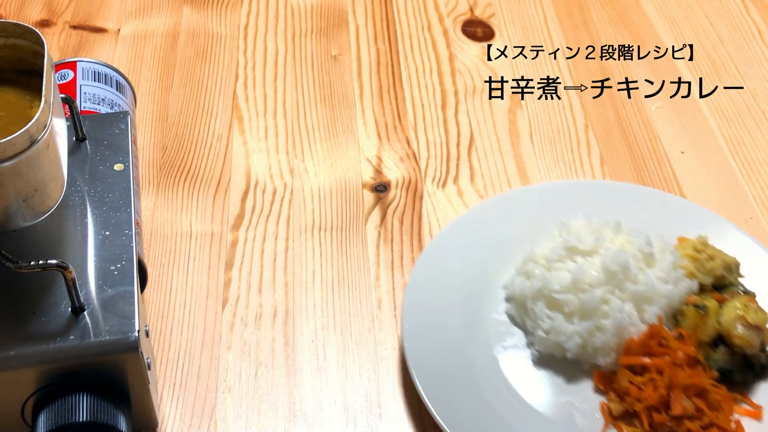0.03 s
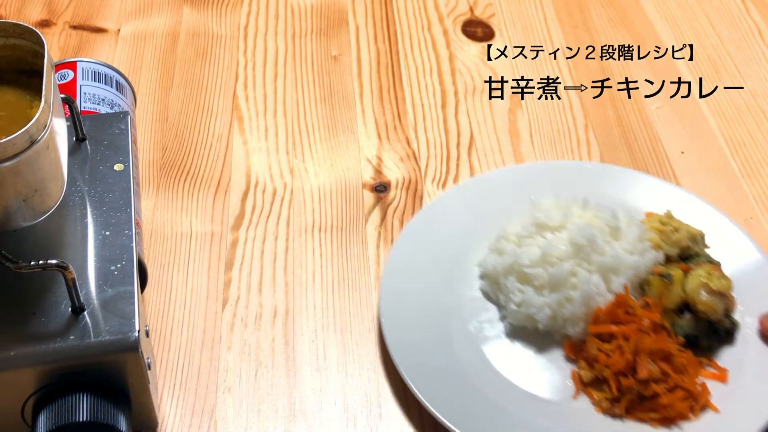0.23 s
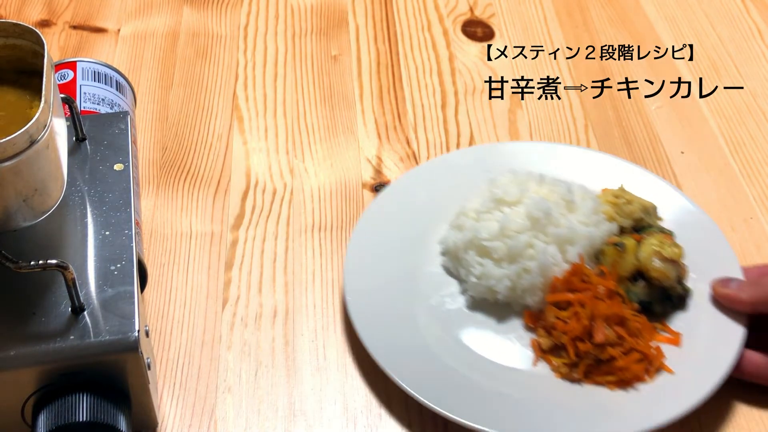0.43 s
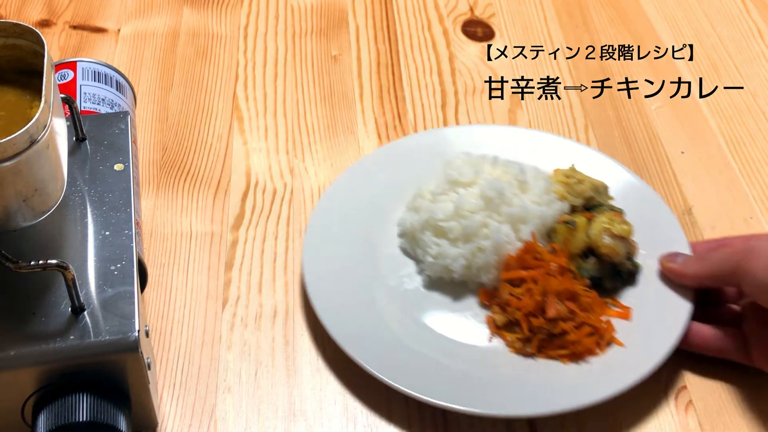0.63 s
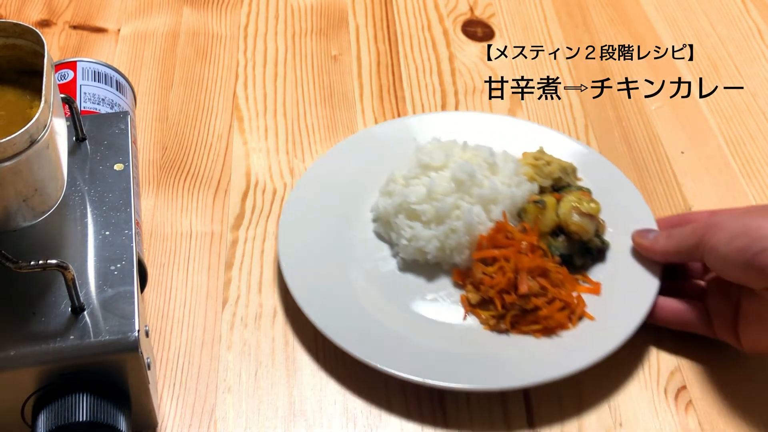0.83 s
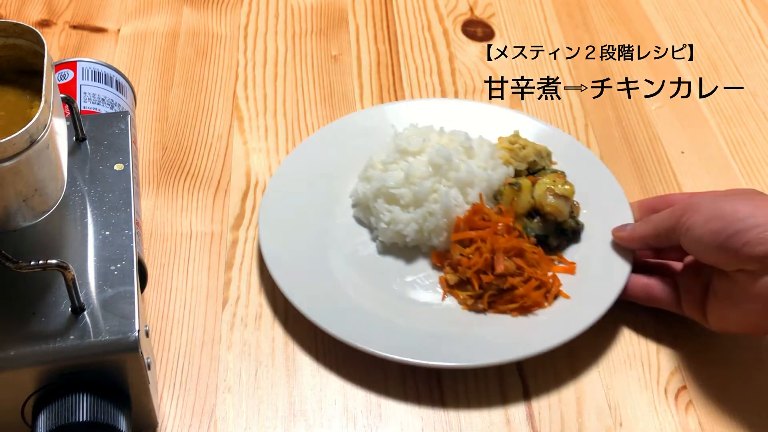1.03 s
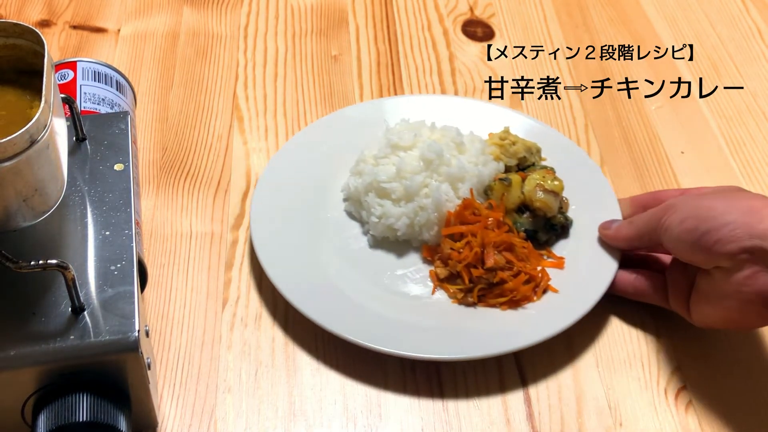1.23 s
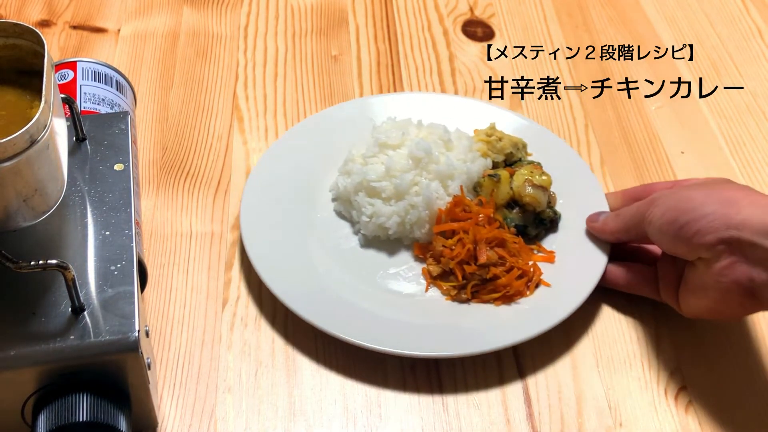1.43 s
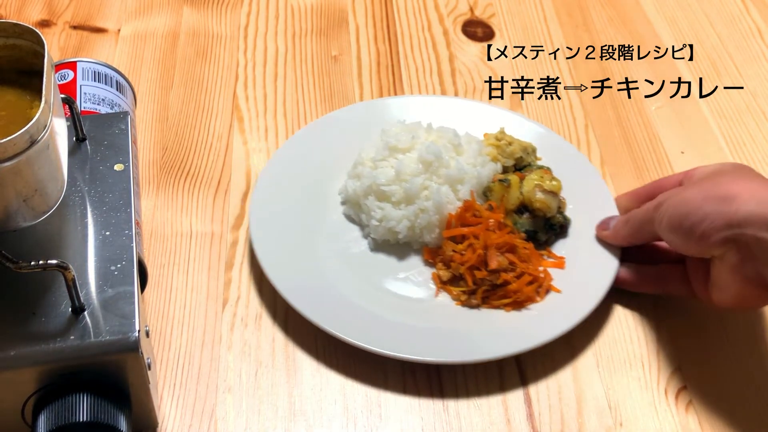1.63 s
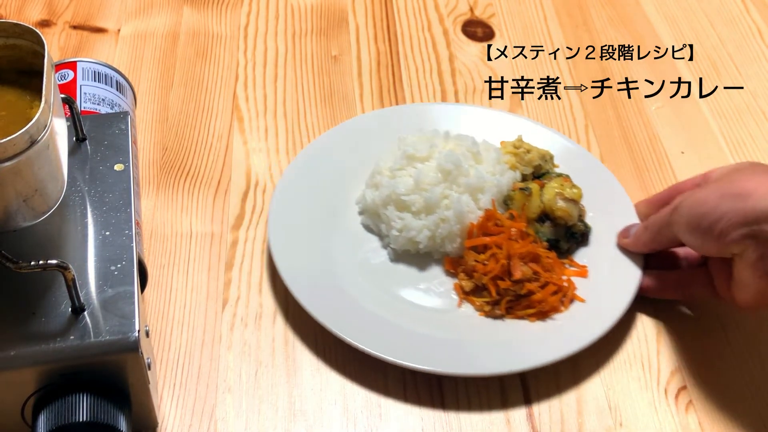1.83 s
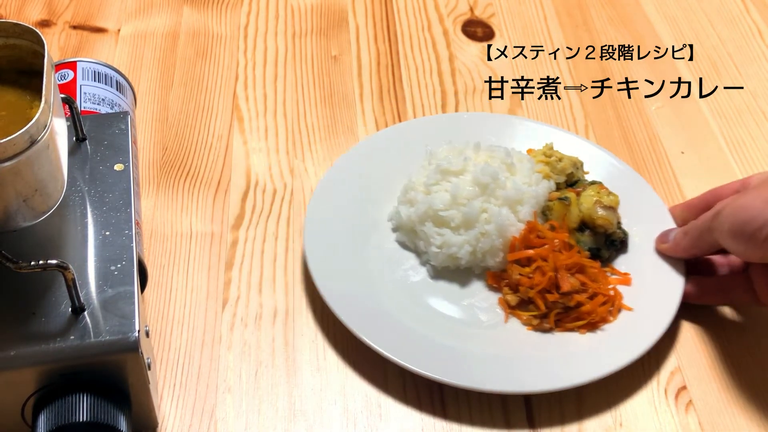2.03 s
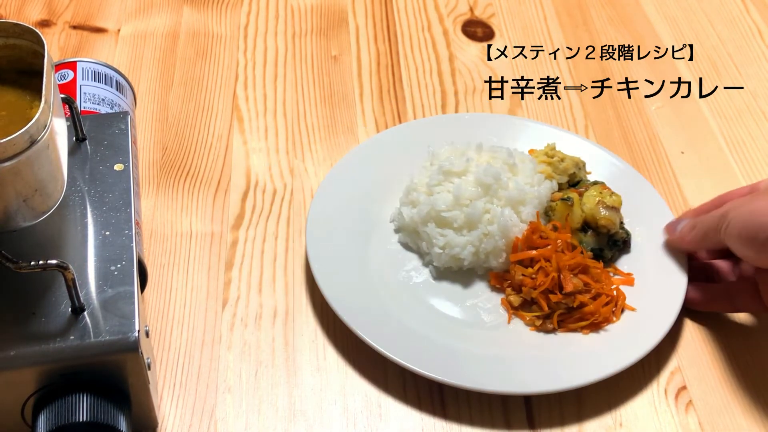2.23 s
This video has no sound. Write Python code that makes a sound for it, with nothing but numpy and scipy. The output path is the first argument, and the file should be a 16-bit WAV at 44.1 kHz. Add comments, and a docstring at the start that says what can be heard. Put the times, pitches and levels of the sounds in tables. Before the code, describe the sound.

A loaded china plate is set down on a wooden table with a dull knock, then pushed across it with a grinding scrape, nudged, and slid again. A few faint ticks sound nearby in a quiet small room.

```python
"""In a quiet small room, a loaded china plate is set down on a wooden table, pushed across it,
nudged, and after a pause slid again. The rim under the plate, its foot ring, knocks on the wood and
then grinds over the grain in thousands of tiny slips. Both shake the same modes (a mode is one note
an object rings at): the boards ring low, the china rings high, and rubbing briefly makes single notes sing.
A few tiny ticks, dry snaps and a light clink sound nearby, over a low murmur of air."""
import sys
import numpy as np
from scipy import signal
from scipy.io import wavfile

SR = 44100
rng = np.random.default_rng(int(sys.argv[2]) if len(sys.argv) > 2 else 0)


def transcribe(u):
    """Save the signal u as a 16-bit wav file named by the first command-line argument.

    u: samples, shape (n,) or (channels, n), limited to [-1, 1]; the rate is SR.
    q: integer samples, one column per channel.
    """
    v = np.clip(np.atleast_2d(u).T, -1, 1)
    q = np.round(v * 32767).astype(np.int16)
    wavfile.write(sys.argv[1], SR, q)


N = 101429
T = np.arange(N) / SR

# Levels in the tables are relative. A ring time, or t60, is how long a sound takes to fade by 60 dB.
# modes of the table top (pitch [Hz], level when rubbed [dB], level when knocked [dB], ring time [s])
WOOD_MODES = [(69, -9, -25, 0.82), (148, -11, -16, 0.071), (206.6, -4, -2, .28), (247.4, -1, -2, 0.54),
              (285.7, -5.5, -17.5, 0.1), (315.7, -9.5, -8.5, 0.061), (353, -6.5, 0, 0.11),
              (395.4, 0, 3.5, 0.22), (432, -9.5, -10.5, 0.076), (604.4, -9.5, -7, 0.094),
              (755, -33, -10, 0.28), (882.5, -9, -10.5, 0.052), (1225, -17, -15, 0.094),
              (1291, -23, -21.5, .1)]
# modes of the plate, damped by the food; the first row, near 1573 Hz, is a high mode of the table top # (pitch
# [Hz], level when rubbed [dB], level when knocked [dB], ring time [s])
CHINA_MODES = [(1573, -20, -15, 0.065), (2386, -28, -28, 0.013), (3041, -24.5, -18, 0.047),
               (3196, -33, -29, 0.047), (3413, -27, -22.5, 0.039), (3957, -34.5, -41, 0.078),
               (4578, -36, -59, 0.061), (4917, -32.5, -45, 0.055), (5085, -40.5, -50, 0.017),
               (6060, -44, -37, 0.026), (7170, -40.5, -41, 0.044), (8900, -57, -58, .03)]
# the foot ring lands, settles, and later jerks as it sticks and slips
# (time [s], force [dB], time for the force to peak [ms], added hard click [dB])
FOOT_KNOCKS = [(0.2466, 35.5, 0.16, -11), (0.2534, 36.5, 0.4, -27), (0.2927, 28, 0.33, -17),
               (0.385, 19, .5, -23), (1.905, 18, 0.6, -24), (1.935, 21.5, 0.4, -30),
               (1.966, 24.5, 0.65, -33)]
# tone of the dull landing thud (frequency [Hz], level [dB])
THUD_TONE = [(30, -40), (65, -11), (105, -11.5), (170, 5.5), (330, -1.5), (600, -1), (900, -11),
             (1200, -23), (2400, -34), (3100, -18.5), (4100, -51.5), (5800, -35), (9000, -55), (16000, -56)]
# how long each part of the thud lasts (frequency [Hz], ring time [s])
THUD_RING_TIMES = [(60, 0.85), (180, 0.21), (350, 0.17), (600, 0.055), (1500, 0.23), (3000, 0.026),
                   (8000, 0.016)]
# how loud the three slides are as they go (time [s], rumble [dB], grind [dB], scrape [dB], hiss [dB])
PUSH_LEVELS = [(0.335, -44.5, -38.5, -53.5, -63), (0.361, -36.5, -55, -56.5, -75),
               (0.397, -46, -46, -45, -62.5), (0.413, -43.5, -46.5, -52.5, -62),
               (0.493, -40.5, -38.5, -47, -62), (0.559, -39.5, -43.5, -50.5, -62),
               (0.611, -43, -34, -45, -59), (0.769, -51.5, -42.5, -51, -63.5),
               (0.819, -44.5, -42, -54, -68), (0.835, -48, -43, -52.5, -62), (0.879, -60, -41.5, -54, -64),
               (0.919, -49.5, -41.5, -59, -66), (1.059, -46.5, -43.5, -53, -62),
               (1.165, -53.5, -50.5, -59, -74), (1.23, -56.5, -55.5, -67, -87)]
NUDGE_LEVELS = [(1.29, -58.5, -56, -71, -92), (1.352, -47.5, -52, -65.5, -80),
                (1.402, -55, -49.5, -65, -74), (1.418, -51, -46, -56.5, -77), (1.46, -51, -50, -63.5, -76),
                (1.5, -59, -58.5, -72.5, -86)]
LAST_SLIDE_LEVELS = [(1.66, -54.5, -69.5, -70.5, -88), (1.71, -48.5, -42.5, -56, -64),
                     (1.768, -43.5, -48, -56.5, -65.5), (1.802, -45.5, -54.5, -61, -76),
                     (1.826, -46.5, -49, -69.5, -71), (1.856, -48, -43.5, -55.5, -63),
                     (1.876, -50, -43.5, -57, -67), (1.92, -37.5, -46, -54.5, -64),
                     (2.028, -46, -35.5, -44.5, -56), (2.068, -43.5, -42.5, -43.5, -56),
                     (2.12, -43.5, -35, -50, -61.5), (2.176, -48, -54, -61, -80),
                     (2.222, -70, -58.5, -72, -103), (2.25, -57.5, -83, -75, -81)]
# where the rumble, grind, scrape and hiss lie (low edge [Hz], high edge [Hz])
SLIDE_BANDS = [(30, 330), (330, 1100), (1100, 4000), (4000, 17000)]
# tone of the slides, set by which part of the foot ring presses on the wood (frequency [Hz], level [dB])
PUSH_TONE = [(60, -9), (200, 5), (320, 0), (395, 1), (600, 3), (690, 3), (880, -0.5), (1300, -1),
             (2200, -4), (3000, -4), (5000, -1), (7000, -3.5), (15000, -8.5)]
LAST_SLIDE_TONE = [(60, -10.5), (110, -4), (200, -2.5), (320, -2), (400, -2.5), (680, 7), (880, -1.5),
                   (1300, 4.5), (2200, 3.5), (3000, 0), (5000, -3), (7000, -2), (15000, -12)]
# the many weak modes between the strong ones (frequency [Hz], level [dB])
WEAK_MODE_TONE = [(40, -38), (110, -29), (200, -20), (330, -17.5), (500, -28.5), (1000, -23), (1400, -24),
                  (2000, -23.5), (2700, -37.5), (4000, -45), (6000, -49), (10000, -49), (16000, -51)]
# notes set singing by rubbing (middle time [s], length [s], pitch [Hz], pitch spread [Hz], level [dB])
SUNG_NOTES = [(.43, .2, 3030, 44, -56.5), (.49, .26, 4580, 47, -63.5), (0.358, 0.27, 4830, 82, -66.5),
              (0.674, 0.39, 4990, 81, -62.5), (.49, 0.087, 890, 27, -44.5), (0.589, 0.075, 810, 10, -39),
              (.81, .16, 389, 9.3, -42), (.94, .1, 390, 6.8, -43), (1.06, 0.22, 281, 3.3, -42.5),
              (1.023, 0.13, 77, 15, -55), (1.8, 0.16, 85, 26, -60), (2, 0.26, 3100, 73, -59),
              (2.05, 0.25, 4900, 170, -61.5), (2.07, .14, 1300, 140, -47.5), (1.9, 0.11, 370, 12, -43)]
# small metallic ticks (time [s], level [dB])
METAL_TICKS = [(.6205, -54), (1.462, -53)]
# modes of the ticking metal (pitch [Hz], level [dB], ring time [s])
METAL_MODES = [(5560, -13, .03), (6680, -6, 0.042), (7800, -8, 0.024), (9490, -0.5, 0.031),
               (11170, -20, .04), (12110, -19, 0.043), (13600, -9, .03), (15130, -14, .04),
               (15900, -9, .04)]
# dry snaps (time [s], level [dB], middle frequency [Hz])
DRY_SNAPS = [(0.297, -61, 11000), (.9505, -57.5, 8500), (.994, -61, 13000), (1.6321, -58, 12200)]
# modes of the light clink (pitch [Hz], level [dB], ring time [s])
CLINK_NOTES = [(3440, 0, 0.069), (3530, -16, 0.027), (6080, -19, 0.095), (7500, -10.5, .12),
               (9300, -23, 0.1), (11100, -17, .1), (13100, -28, .08)]
# tone of the air in the room (frequency [Hz], level [dB])
AIR_TONE = [(15, -46.5), (25, -27), (59, -10), (120, -20), (153, -2.5), (326, -23.5), (531, -20.5),
            (591, -22.5), (2280, -36.5), (16000, -47)]

SLIPS_PER_S, SLIP_SPREAD_DB = 6000, 3
CHATTER_DB, CHATTER_HZ = 0.8, 83  # a fast, random flutter in the strength of the slips
SLIDE_RISE_S, SLIDE_FALL_S = 0.1025, 0.095
ECHO_DB, ECHO_T60_S = -12, 0.55


def knocks(response, low_cut_hz=110):
    """The foot ring strikes the boards; the shorter the blow, the brighter it sounds."""
    force, t = np.zeros(N), T[:SR // 10]
    for s, db, peak_ms, click_db in FOOT_KNOCKS:
        progress = t * 1000 / peak_ms
        blow = progress * np.exp(-progress)
        click = amp(click_db) * (t == 0)
        add(force, s, amp(db) * (blow / blow.sum() + click))
    low_cut = signal.butter(2, low_cut_hz, "highpass", fs=SR, output="sos")
    return through(signal.sosfilt(low_cut, force), response)


def landing_thud(start_s=0.2455, energy_db=8.5, rise_cycles=0.42):
    """The plate lands with a dull thud, whose bass swells later than its treble."""
    out, thud, t = np.zeros(N), np.zeros(SR // 2), T[:SR // 2]
    noise = colour(rng.standard_normal(SR), THUD_TONE)
    for hz in 1.2 * 2. ** np.arange(5, 14):  # the low edge of each octave
        octave = band(noise, [hz, 2 * hz])[-len(t):]
        rise = 1 - np.exp(-(t * hz / rise_cycles) ** 2)
        thud += octave * rise * fade(read(THUD_RING_TIMES, hz * np.sqrt(2)))
    add(out, start_s, amp(energy_db) * thud / np.linalg.norm(thud))
    return out


def slide(response, levels, tone, gain_db):
    """Thousands of tiny uneven slips shake the table and the plate."""
    size_db = SLIP_SPREAD_DB * np.minimum(rng.exponential(1, N), 4)
    sizes = amp(size_db) * rng.choice([-1, 1], N)
    chatter = unit(band(rng.standard_normal(N), [CHATTER_HZ / 2, CHATTER_HZ * 2], order=2))
    slipping = rng.random(N) < SLIPS_PER_S / SR
    slips = sizes * slipping * amp(CHATTER_DB * chatter)
    grinding = colour(through(slips, response) + weak_modes(slips), tone)
    times, *curves = np.transpose(levels)
    start, end = times[0], times[-1]
    moving = np.interp(T, [start - SLIDE_RISE_S, start, end, end + SLIDE_FALL_S], [0, 1, 1, 0])
    bands = [unit(band(grinding, edges)) * amp(np.interp(T, times, curve))
             for edges, curve in zip(SLIDE_BANDS, curves)]
    return amp(gain_db) * moving * sum(bands)


def table_and_plate(knocked):
    """How the wood and the china ring together after one tiny blow."""
    response = np.zeros(SR // 2)
    for k, (hz, rub_db, knock_db, t60) in enumerate(WOOD_MODES + CHINA_MODES):
        balance = 2 * np.log(1000) / (t60 * SR)  # long and short modes boost their own pitch alike
        response += (-1) ** k * balance * ring(hz, knock_db if knocked else rub_db, t60)
    return response


def weak_modes(slips, spots=4, new_spot_s=0.1571, t60=0.061):
    """Each new spot of the table answers the slips with its own weak modes."""
    out, place = np.zeros(N), T / new_spot_s
    for k in range(spots):  # the spots take turns, each fading into the next
        distance = abs((place - k + spots / 2) % spots - spots / 2)
        share = np.cos(np.pi / 2 * np.minimum(distance, 1))
        out += through(slips * share, noise_tail(t60))
    return colour(out, WEAK_MODE_TONE)


def singing(steadiness=0.56):
    """Single modes swell and fade as the foot ring catches; rubbing evens out their strength."""
    out = np.zeros(N)
    for middle_s, length, hz, spread_hz, db in SUNG_NOTES:
        t = np.arange(round(length * SR)) / SR
        t60 = np.log(1000) / (np.pi * spread_hz)
        shaken = through(rng.standard_normal(SR), ring(hz, 0, t60))
        wavering = signal.hilbert(band(shaken, [hz / 1.5, hz * 1.5], order=2))[-len(t):]
        note = unit(wavering.real / abs(wavering) ** steadiness)  # abs() is its strength at each moment
        swell = np.sin(np.pi * t / length)
        add(out, middle_s - length / 2, amp(db) * note * swell)
    return out


def small_clicks(tick_crack_db=-5.5, clink_s=2.2875, clink_db=-50.5):
    """Metallic ticks, perhaps from a cooling stove, dry snaps and a light clink."""
    out = np.zeros(N)
    metal = sum(ring(*mode) for mode in METAL_MODES)
    for s, db in METAL_TICKS:
        add(out, s, amp(db) * (metal + amp(tick_crack_db) * crack(hz=11000)))
    for s, db, hz in DRY_SNAPS:
        add(out, s, amp(db) * crack(hz))
    add(out, clink_s, amp(clink_db) * sum(ring(*mode) for mode in CLINK_NOTES))
    return out


def crack(hz, octaves=0.8, t60=0.016):
    """A few milliseconds of bright noise."""
    edges = hz * 2 ** (octaves * np.array([-0.5, 0.5]))
    return unit(band(rng.standard_normal(SR // 2), edges, order=2)) * fade(t60)


def room_echo(sound):
    """The walls of the small room send back a soft, fading wash of sound."""
    return amp(ECHO_DB) * through(sound, noise_tail(ECHO_T60_S))


def room_air(db=-57):
    """A steady low murmur of air with a faint hiss."""
    return amp(db) * unit(colour(rng.standard_normal(N + SR), AIR_TONE)[SR:])


def ring(hz, db, t60):
    """One mode: a pure note that dies away."""
    return amp(db) * fade(t60) * np.sin(2 * np.pi * hz * T[:SR // 2])


def noise_tail(t60):
    """A dying burst of noise with a total energy of 1."""
    tail = rng.standard_normal(SR // 2) * fade(t60)
    return tail / np.linalg.norm(tail)


def fade(t60):
    """A half-second curve that falls by 60 dB every t60 seconds."""
    return np.exp(-np.log(1000) * T[:SR // 2] / t60)


def through(x, response):
    """Lets every sample of x set off the response, keeping the length of x."""
    return signal.fftconvolve(x, response)[:len(x)]


def colour(x, points, size=8192):
    """Gives x the tone in a table, with no ringing ahead of the sound."""
    hz = abs(np.fft.fftfreq(size, 1 / SR))
    log_gain = np.log(amp(read(points, hz)))
    spectrum = np.exp(np.conj(signal.hilbert(log_gain)))
    return through(x, np.fft.ifft(spectrum).real[:size // 2])


def band(x, edges, order=4):
    """Keeps the frequencies between two edges."""
    return signal.sosfilt(signal.butter(order, edges, "bandpass", fs=SR, output="sos"), x)


def read(points, hz):
    """Reads between the rows of a table, with frequency spaced in octaves."""
    frequencies, values = np.transpose(points)
    return np.interp(np.log(hz + 1), np.log(frequencies), values)


def add(mix, s, sound):
    """Mixes a sound in, starting at s seconds."""
    part = mix[round(s * SR):][:len(sound)]
    part += sound[:len(part)]


def amp(db):
    """Turns decibels into a number to multiply by."""
    return 10 ** (np.asarray(db) / 20)


def unit(x):
    """Scales x to an average strength (rms) of 1."""
    return x / np.sqrt(np.mean(x ** 2) + 1e-20)


def scene():
    """The plate lands and slides three times, with small clicks nearby and the room around it."""
    rubbed = table_and_plate(knocked=False)
    push = slide(rubbed, PUSH_LEVELS, PUSH_TONE, gain_db=-1.57)
    nudge = slide(rubbed, NUDGE_LEVELS, PUSH_TONE, gain_db=-1.0)
    last_slide = slide(rubbed, LAST_SLIDE_LEVELS, LAST_SLIDE_TONE, gain_db=-1.06)
    bumps = knocks(table_and_plate(knocked=True)) + landing_thud()
    near = bumps + push + nudge + last_slide + singing() + small_clicks()
    return (near + room_echo(near) + room_air())[None]


def record(dry):
    """Cuts away the very highest treble, above 16150 Hz."""
    treble_cut = signal.firwin(511, 16150, window=("kaiser", 9), fs=SR)
    return signal.oaconvolve(dry, treble_cut[None], "same")


dry = scene()
out = record(dry)
transcribe(out)
```